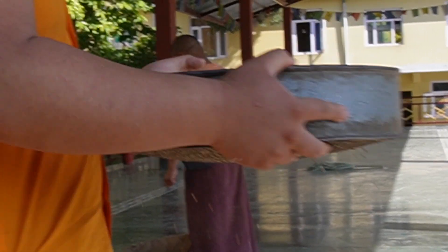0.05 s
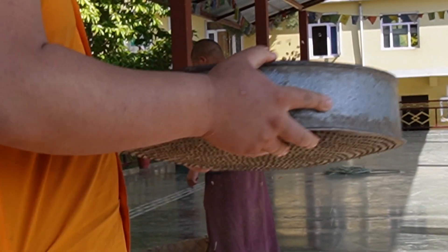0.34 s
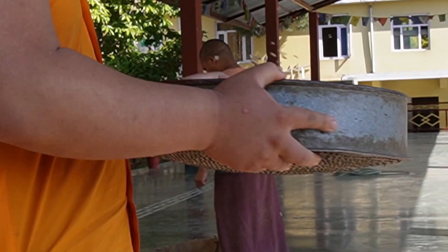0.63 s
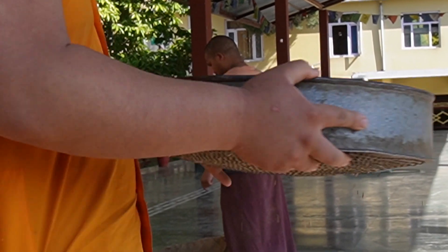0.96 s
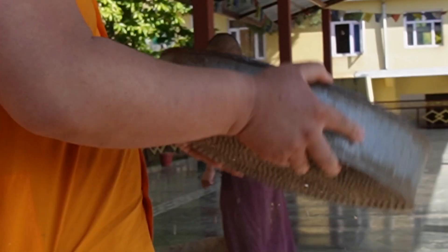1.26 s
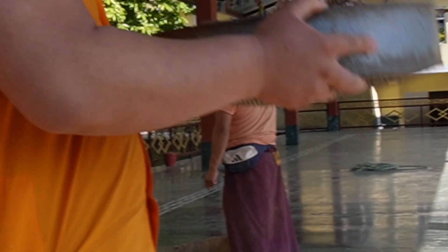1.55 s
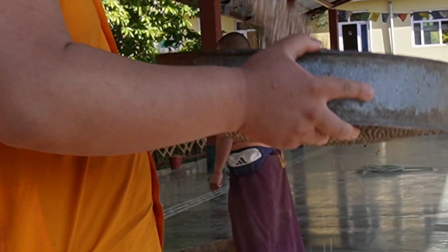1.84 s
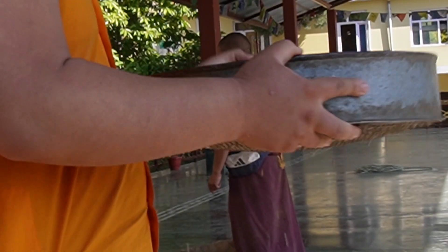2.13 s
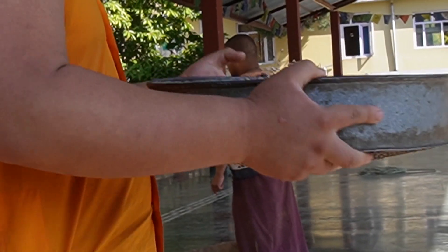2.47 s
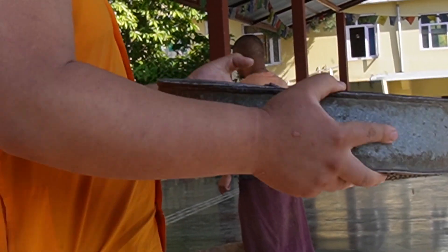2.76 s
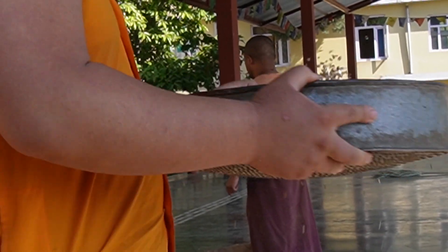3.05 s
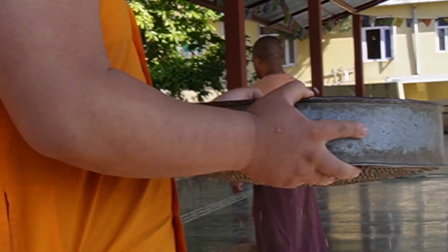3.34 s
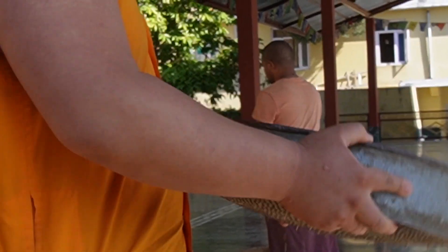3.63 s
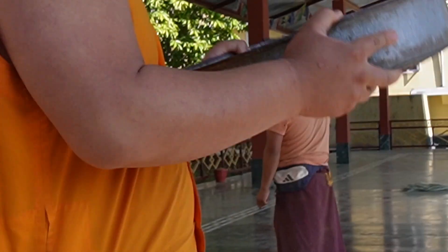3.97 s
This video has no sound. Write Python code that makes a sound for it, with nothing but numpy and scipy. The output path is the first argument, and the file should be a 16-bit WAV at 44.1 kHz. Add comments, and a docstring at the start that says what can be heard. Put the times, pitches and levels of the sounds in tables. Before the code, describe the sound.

Rhythmic rattling of grain shaken in a metal sieve, with one toss and catch.

```python
"""Sieving grain in a courtyard

Grain is shaken to and fro in a round metal sieve, about five strokes a second, tossed once and caught.
Each stroke throws thousands of kernels over the mesh: they rattle, hiss and ring the pan;
between strokes they trickle on. The stereo microphone is close, under a courtyard roof,
with a faint hum and distant rumble behind."""
import sys
import numpy as np
from scipy import signal
from scipy.fft import rfft, irfft
from scipy.io import wavfile

SR = 44100
rng = np.random.default_rng(int(sys.argv[2]) if len(sys.argv) > 2 else 0)


def transcribe(signal):
    """Save signal, clipped to [-1, 1], as a 16-bit WAV file at the path in sys.argv[1]."""
    frames = np.atleast_2d(signal).T
    limited = np.clip(frames, -1, 1)
    pcm = np.round(limited * 32767).astype(np.int16)
    wavfile.write(sys.argv[1], SR, pcm)


N = 176400
T = np.arange(N) / SR


def amp(db):
    """Decibels to gain."""
    return 10 ** (np.asarray(db) / 20)


def unit(x):
    """Scale to rms 1."""
    return x / np.sqrt(np.mean(x ** 2))


def curve(rows):
    """Gain over time through (time_s, level_db) points, silent outside them."""
    return amp(np.interp(T, *np.array(rows).T, left=-120, right=-120))


def swell(at, rise, fall, shape=2):
    """A rise and fall around one moment: shape 2 is a bell, lower is more pointed, higher is flatter."""
    return np.exp(-np.abs((T - at) / np.where(T < at, rise, fall)) ** shape)


def flutter(rate_hz, depth_db):
    """A factor that wanders randomly around 1."""
    knots = rng.standard_normal(2000)
    return amp(depth_db * np.interp(T * rate_hz, np.arange(len(knots)), knots))


def colour(x, points, keep_power=True):
    """Causal filter through (freq_hz, gain_db) points; keep_power scales it to unit power gain."""
    size = 2 * N
    hz, db = np.array(points).T
    gain = amp(np.interp(np.log(np.fft.rfftfreq(size, 1 / SR) + 1), np.log(hz), db))
    cepstrum = irfft(np.log(unit(gain) if keep_power else gain))
    cepstrum[1:N] *= 2  # minimum phase: ringing only follows a hit
    cepstrum[N + 1:] = 0
    return irfft(rfft(x, size) * np.exp(rfft(cepstrum)))[..., :N]


def widen(x, db):
    """Raise the side signal of a mid and side pair."""
    return np.array([x[0], amp(db) * x[1]])


def impacts(per_s, spread_db):
    """Random tiny impacts, mid and side; each has its own size and place in the sieve."""
    hit = rng.random(N) < per_s / SR
    size = amp(spread_db * np.clip(rng.standard_normal(N), -2.5, 2.5))
    mid = unit(hit * size * np.sign(rng.standard_normal(N)))
    return np.array([mid, mid * rng.standard_normal(N)])


def distant_rumble():
    """Low, steady noise from far behind the sieve."""
    # spectrum of the courtyard: freq_hz, gain_db
    yard_spectrum = [(22, -25), (40, -9.5), (65, -4.5), (100, -2), (170, 1), (260, 0.5), (400, 0), (600, 0),
                     (900, -0.5), (2000, -23), (8000, -55)]
    return amp(-57) * colour(rng.standard_normal((2, N)), yard_spectrum)


def faint_hum():
    """Low tones waver in pitch and level; each swells or dips once."""
    # tones of the hum: pitch_hz, level_db, swell_at_s, swell_db
    tones = [(102, -78, 1., -3), (151.6, -73, 3.77, 6.5), (203, -71.5, 1.43, 8), (345, -83, 1.55, 16.5)]
    hum = 0
    for hz, db, at, swell_db in tones:
        cycles = np.cumsum(hz * flutter(rate_hz=7, depth_db=0.38)) / SR
        level = amp(db + swell_db * swell(at, 0.28, 0.28, shape=4.7))
        hum += np.sqrt(2) * np.sin(2 * np.pi * cycles) * level * flutter(rate_hz=6.43, depth_db=2.5)
    return hum


def air_buffets():
    """Soft, low puffs of air strike the microphone."""
    # puffs: peak_s, level_db, half_length_s
    buffets = [(0.19, -53, 0.047), (0.31, -52, .015), (0.387, -49.5, 0.02)]
    # spectrum of a puff: freq_hz, gain_db
    buffet_spectrum = [(20, -26), (45, -1), (70, 1), (110, -4), (180, -10), (350, -9), (1000, -67)]
    puffs = sum(amp(db) * swell(at, half, half) for at, db, half in buffets)
    return colour(rng.standard_normal(N) * puffs, buffet_spectrum)


def roof_echo(source, t60_s=0.61, delay_s=0.0065):
    """The roof returns a diffuse, dying echo, wider than the strokes."""
    t = T[:int(t60_s * SR)]
    decay = np.exp(-np.log(1000) * t / t60_s) * (t >= delay_s)
    response = rng.standard_normal((2, N // 2))[:, :len(t)] * decay
    echo = signal.oaconvolve(np.array([source, source]), unit(response) / np.sqrt(len(t)), axes=1)
    return widen(echo[:, :N], db=3.5)


def rim_ticks():
    """Stray kernels click on the rim."""
    # single strikes: start_s, level_db
    ticks = [(1.267, -18), (1.41, -17.5), (1.4325, -15)]
    # ring of the rim: freq_hz, gain_db
    rim_spectrum = [(400, -18), (1200, 3), (2200, 21), (4000, -6), (7000, -19), (15000, -32)]
    clicks = np.zeros((2, N))
    for at, db in ticks:
        clicks[0, int(at * SR)] += amp(db)
    return colour(clicks, rim_spectrum)


def sieve_knocks():
    """The sieve jolts in the hands and the whole bed of grain slaps the mesh."""
    # jolts: peak_s, level_db, decay_s
    knocks = [(2.076, -27.5, 0.0077), (2.086, -23.5, 0.015), (3.612, -39, .004), (3.68, -38, .004),
              (3.735, -42, .004), (3.79, -42, .005), (3.892, -41, .005)]
    # spectrum of the slap: freq_hz, gain_db
    knock_spectrum = [(300, -57), (700, -24), (1000, -10.5), (1560, -0.5), (1900, -5.5), (2400, -8.5),
                      (3800, -11.5), (6000, -23), (14000, -36)]
    jolt = sum(amp(db) * swell(at, 0.0029, decay, shape=0.74) for at, db, decay in knocks)
    return colour(impacts(per_s=8000, spread_db=3.5) * jolt, knock_spectrum)


def sliding_grain():
    """Kernels roll over each other in a dull, dense, even trickle; on a tilt the heap skids thinly."""
    # loose grain on the tilted mesh: time_s, level_db
    slide = [(0, -41), (.3, -36.5), (1.1, -38), (1.22, -41.5), (1.345, -40.5), (1.39, -45.5), (1.44, -39),
             (1.52, -39.5), (1.59, -43), (1.7, -39.5), (2.05, -40), (2.25, -37), (3.0, -38.5), (3.7, -38),
             (3.9, -39.5), (4.0, -41)]
    # spectrum of rolling kernels: freq_hz, gain_db
    trickle_spectrum = [(400, -32), (800, -9), (1150, -2.5), (1550, 1), (2500, 1.5), (3300, 2), (4300, 1),
                        (5200, -3.5), (6500, -9.5), (9000, -21), (12000, -34.5), (16000, -46)]
    # skids of the heap: peak_s, level_db, half_length_s
    skids = [(1.31, -52, 0.045), (1.487, -53, 0.047), (3.86, -43.5, .08)]
    # thin rustle of a skid: freq_hz, gain_db
    skid_spectrum = [(1000, -39), (2500, -16), (3700, -9), (4500, 1), (5200, -2), (6500, -12), (9000, -26),
                     (16000, -44)]
    kernels = impacts(per_s=7000, spread_db=2.5) * curve(slide)
    rolling = colour(kernels * flutter(rate_hz=50, depth_db=0.96), trickle_spectrum)
    tilt = sum(amp(db) * swell(at, half, half) for at, db, half in skids)
    skidding = colour(rng.standard_normal((2, N)) * tilt, skid_spectrum)
    return widen(rolling + skidding, db=8.5)


def shaken_grain():
    """Strokes and the falling shower drive the pan's ring, the kernels' rattle and the mesh's hiss."""
    # strokes of the sieve: peak_s, level_db, rise_s, fall_s, ring_offset_db, hiss_offset_db
    strokes = [ (.058, -6, 0.091, 0.069, 1, -0.5), (0.245, -1.1, 0.054, 0.056, -1.5, -1),
               (.452, -2.5, 0.08, 0.063, -3, 0.5), (0.643, -0.5, 0.078, .044, -2, -0.5),
               (0.829, -4, 0.09, 0.054, -2, 0.5), (1.013, -2, 0.072, 0.047, 0.5, -0.5),
               (1.155, -12.5, 0.085, 0.074, -9, -4), (2.125, -7.5, 0.032, .1, -0.5, -1.5),
               (2.347, -4, 0.084, 0.057, 1, 1.5), (2.539, -1, 0.062, 0.058, 0, 0.5),
               (2.752, -5, 0.091, .052, 0, 1.5), (2.917, -1, 0.059, 0.06, 0, 0),
               (3.125, -3, 0.082, 0.062, -1.5, -0.5), (3.326, -0.5, 0.078, 0.047, -1, -0.5),
               (3.525, -6.5, 0.1, 0.062, -3.5, -1), (3.655, -12, 0.064, 0.058, 2.5, -3),
               (3.775, -24, 0.053, 0.038, 6, 5)]
    # the tossed grain rains back: time_s, level_db
    shower = [(1.585, -30), (1.645, -11.5), (1.72, -7), (1.80, -6), (1.885, -8), (1.94, -15), (2.0, -21.5),
              (2.07, -15)]
    # ring of the metal pan: freq_hz, gain_db
    pan_spectrum = [(400, -33.5), (600, -38), (780, -21), (980, -11), (1150, -8), (1420, -0.5), (1580, 1.3),
                    (1850, -6.5), (2150, -9), (3000, -18.5), (6000, -65)]
    # rattle of the kernels: freq_hz, gain_db
    rattle_spectrum = [(500, -37), (1000, -12.5), (1500, 0.5), (1950, 1.5), (2200, -4.5), (2500, 1),
                       (2950, 0.5), (3400, 2), (3900, 1), (4700, -2.5), (5500, -9), (8000, -17),
                       (16000, -25.5)]
    # hiss of the mesh: freq_hz, gain_db
    hiss_spectrum = [(1500, -33), (3500, -15), (5500, 1.5), (6600, 0), (8000, -1.5), (10000, -4.5),
                     (12000, -10.5), (13500, -13), (16000, -17.5)]
    ring_lead_s, ring_stretch = 0.0071, 0.93  # the pan rings first
    hiss_lag_s, hiss_stretch = 0.0048, 1.076  # the hiss follows and lasts a little longer
    falling = curve(shower)
    rattle_power = falling ** 2
    ring_power = (falling * amp(-1)) ** 2
    hiss_power = (falling * amp(1)) ** 2
    for at, db, rise, fall, ring_db, hiss_db in strokes:
        ring_swell = swell(at - ring_lead_s, rise * ring_stretch, fall * ring_stretch, shape=1.99)
        hiss_swell = swell(at + hiss_lag_s, rise * hiss_stretch, fall * hiss_stretch, shape=1.88)
        rattle_power += (amp(db) * swell(at, rise, fall, shape=1.99)) ** 2
        ring_power += (amp(db + ring_db) * ring_swell) ** 2
        hiss_power += (amp(db + hiss_db) * hiss_swell) ** 2
    clumps = flutter(rate_hz=70, depth_db=-0.54)  # clumps of grain come and go
    kernel_hits = impacts(per_s=14000, spread_db=3.5) * clumps
    pan_hits = impacts(per_s=6000, spread_db=7.5) * clumps
    mesh_hits = impacts(per_s=12000, spread_db=1.5) * clumps
    ring = amp(-29) * colour(pan_hits * np.sqrt(ring_power), pan_spectrum)
    rattle = amp(-25.5) * colour(kernel_hits * np.sqrt(rattle_power), rattle_spectrum)
    hiss = amp(-34) * colour(mesh_hits * np.sqrt(hiss_power), hiss_spectrum)
    return ring + rattle + hiss


def stereo_image(mid, side):
    """Left and right agree in the middle range and part in the treble, which leans to the left."""
    # stereo width: freq_hz, side_gain_db
    width = [(30, -33), (120, -19), (280, -15), (600, -14), (800, -21.5), (1000, -41.5), (1400, -60.5),
             (1900, -66.5), (2500, -43), (3200, -21.5), (4000, -19), (6000, -10), (8500, -10),
             (13000, -4.5)]
    # lean of the treble: freq_hz, left_minus_right_db
    balance = [(1500, 0), (4000, .9), (8000, 1.3), (12000, 2.5)]
    side = colour(side, width, keep_power=False)
    spectra = rfft(np.array([mid + side, mid - side]), 2 * N)
    lean_db = np.interp(np.fft.rfftfreq(2 * N, 1 / SR), *np.array(balance).T)
    return irfft(spectra * amp(np.array([lean_db, -lean_db]) / 2))[:, :N]


def scene():
    """The sieve close to the microphone, the roof overhead, the courtyard behind."""
    sieve = shaken_grain() + sliding_grain() + sieve_knocks() + rim_ticks()
    mid, side = sieve + amp(-18) * roof_echo(sieve[0]) + distant_rumble()
    return stereo_image(mid + faint_hum() + air_buffets(), side)


def record(dry):
    """The recorder cuts the top treble steeply."""
    top_hz = 15800
    return signal.sosfilt(signal.ellip(12, .1, 80, top_hz, fs=SR, output="sos"), dry)


dry = scene()
out = record(dry)
transcribe(out)
```